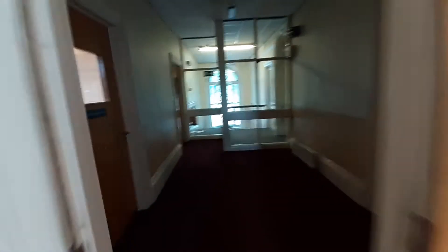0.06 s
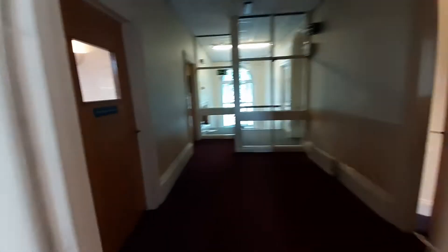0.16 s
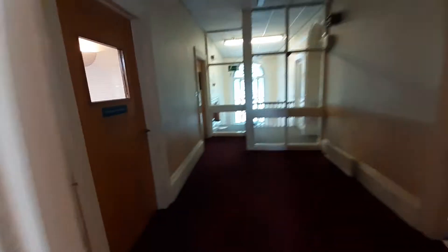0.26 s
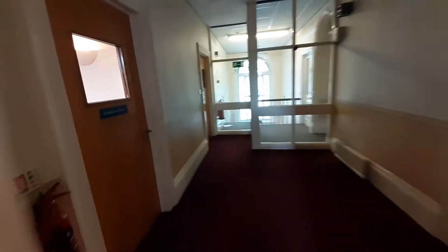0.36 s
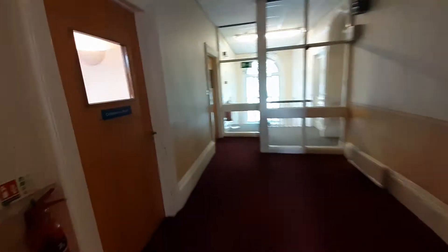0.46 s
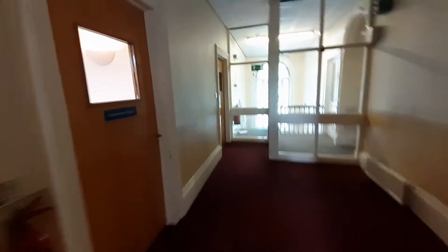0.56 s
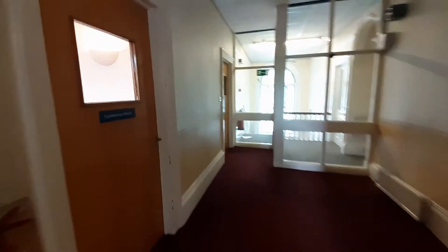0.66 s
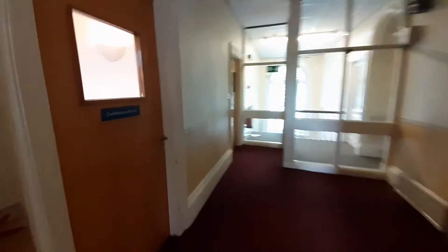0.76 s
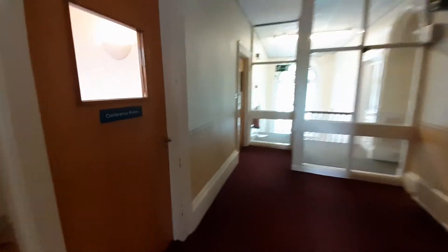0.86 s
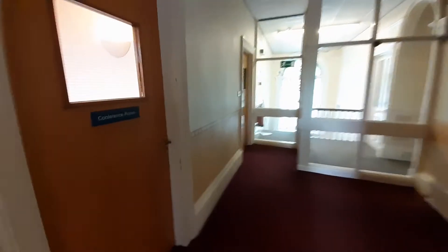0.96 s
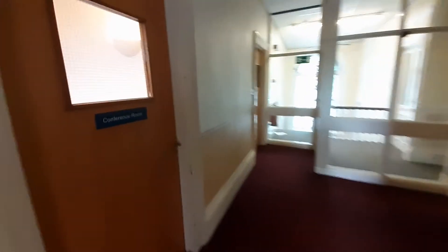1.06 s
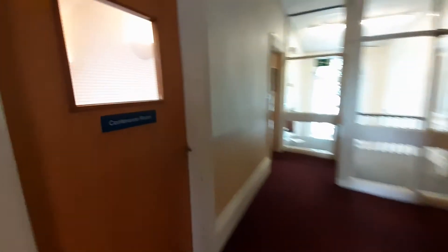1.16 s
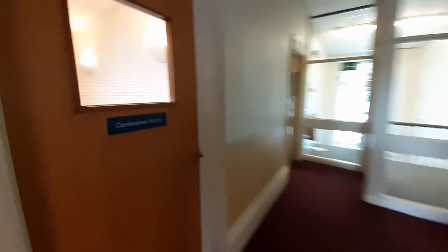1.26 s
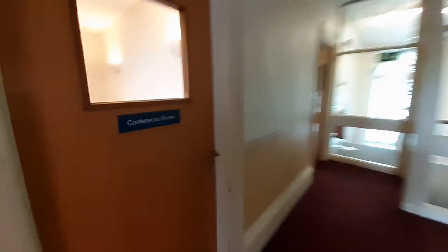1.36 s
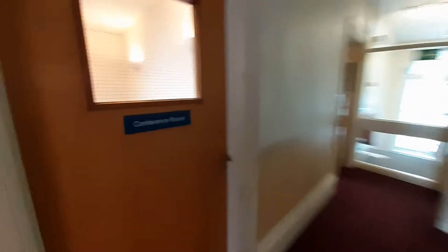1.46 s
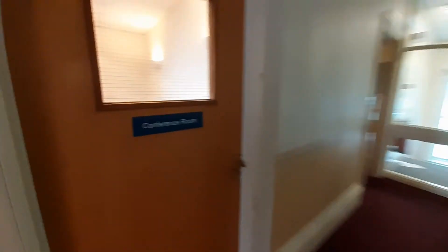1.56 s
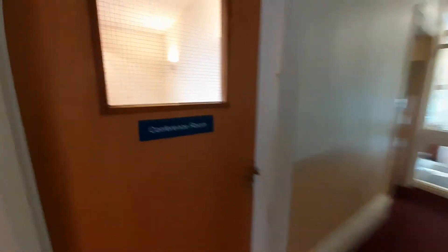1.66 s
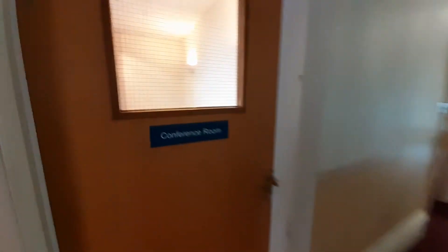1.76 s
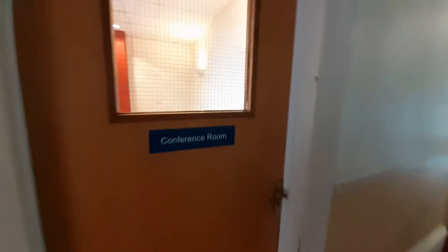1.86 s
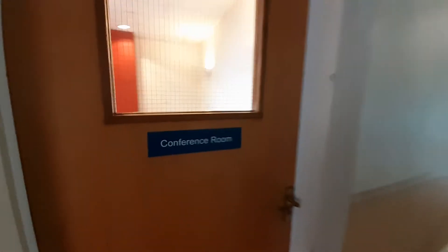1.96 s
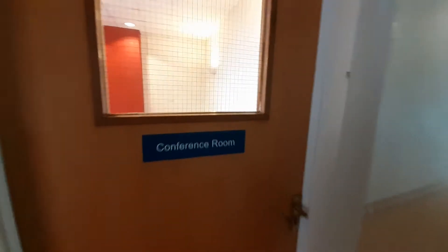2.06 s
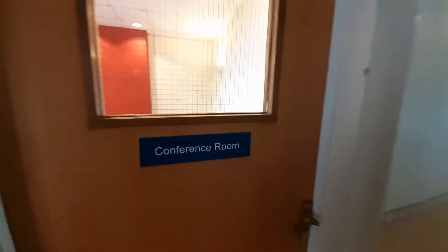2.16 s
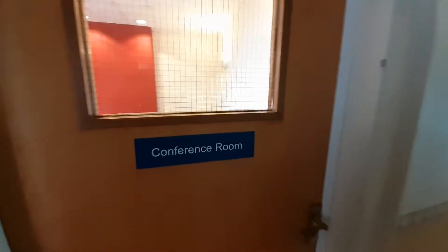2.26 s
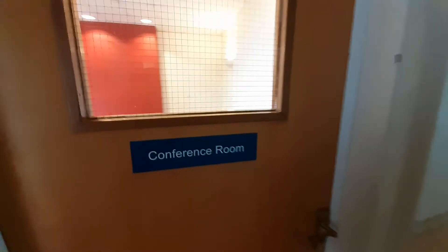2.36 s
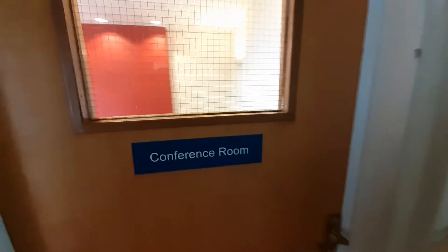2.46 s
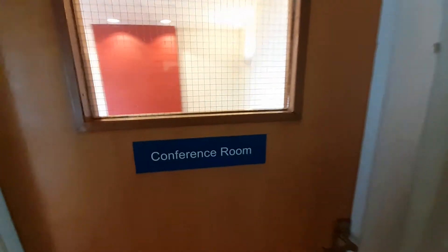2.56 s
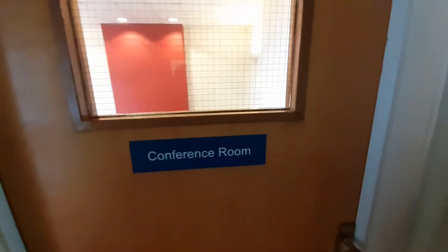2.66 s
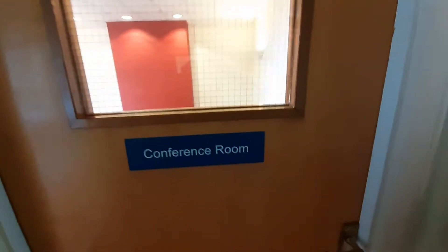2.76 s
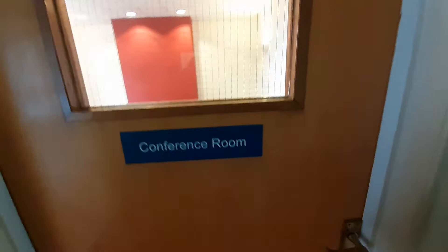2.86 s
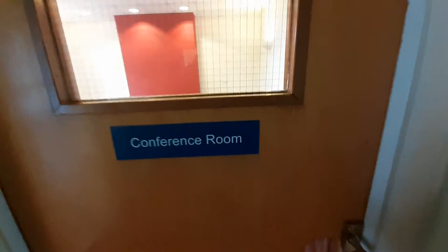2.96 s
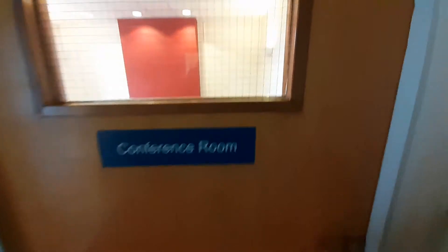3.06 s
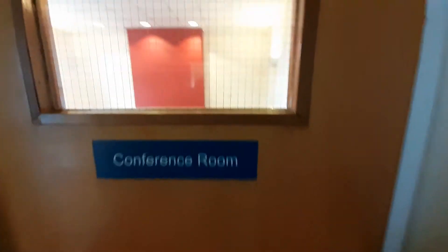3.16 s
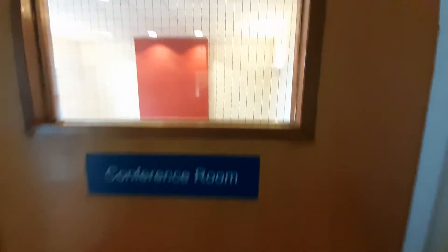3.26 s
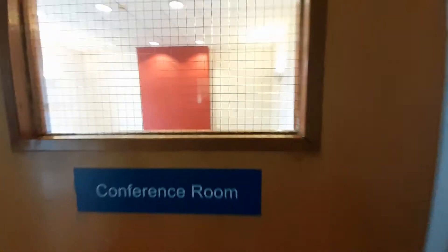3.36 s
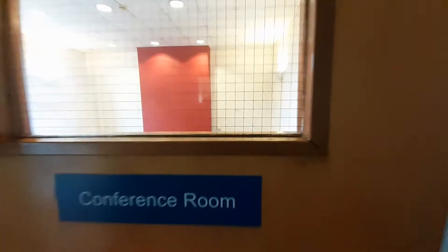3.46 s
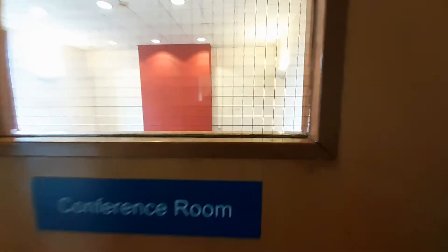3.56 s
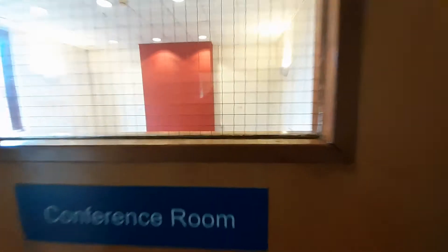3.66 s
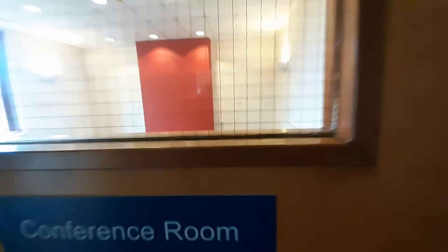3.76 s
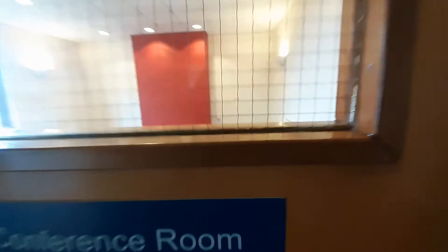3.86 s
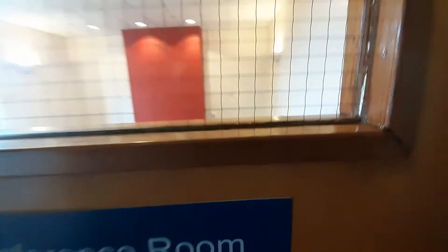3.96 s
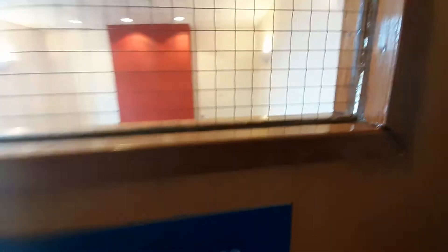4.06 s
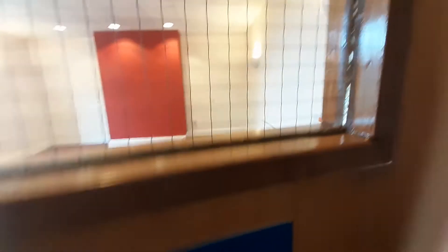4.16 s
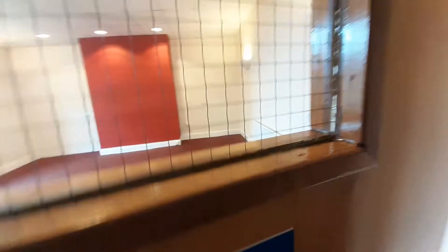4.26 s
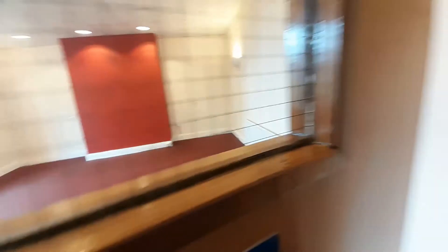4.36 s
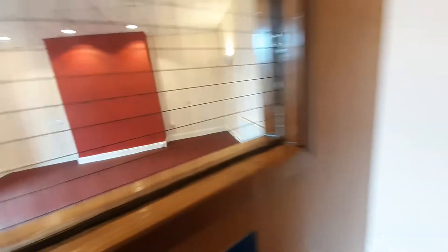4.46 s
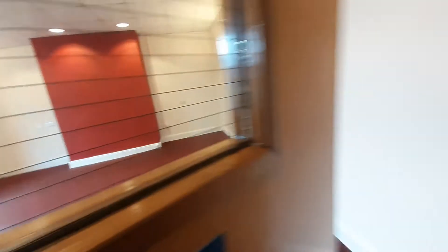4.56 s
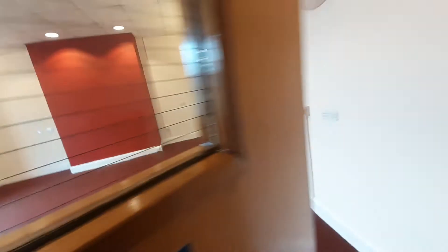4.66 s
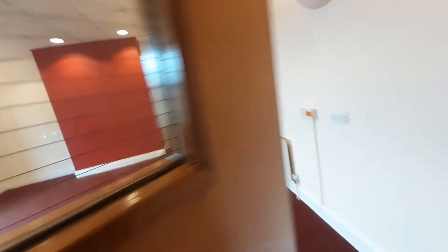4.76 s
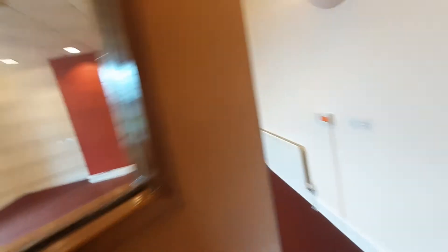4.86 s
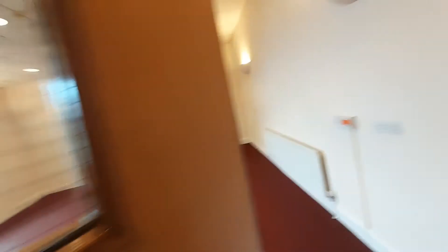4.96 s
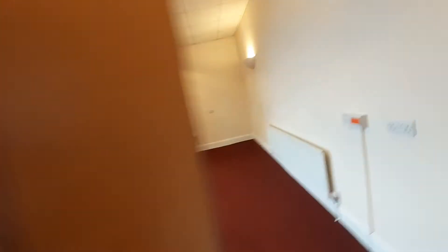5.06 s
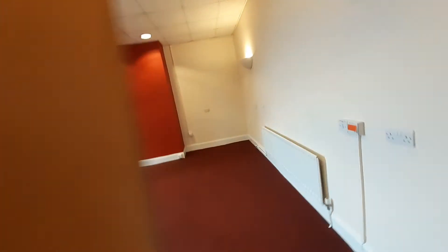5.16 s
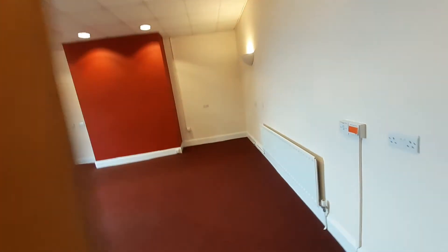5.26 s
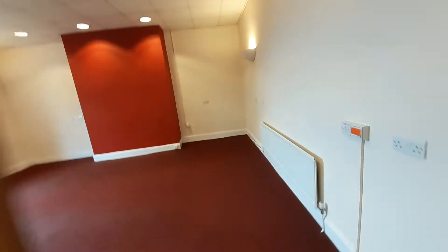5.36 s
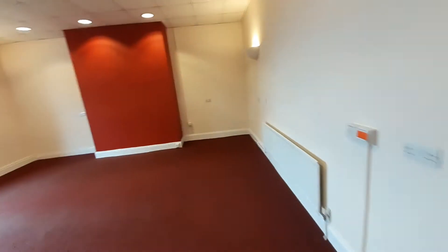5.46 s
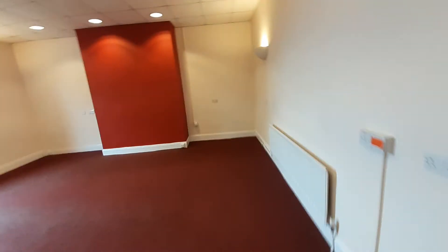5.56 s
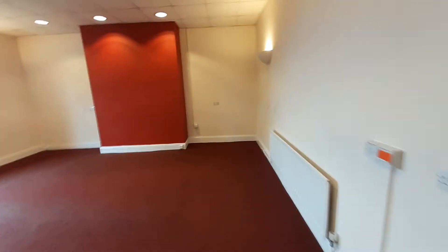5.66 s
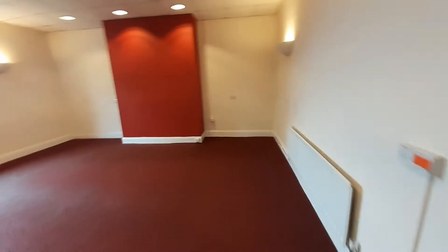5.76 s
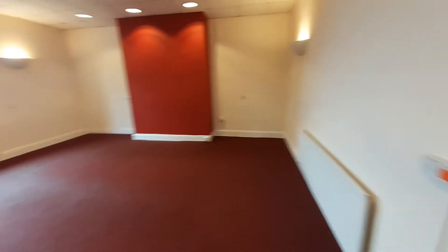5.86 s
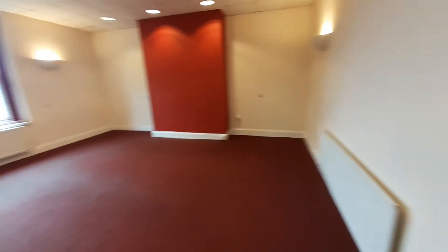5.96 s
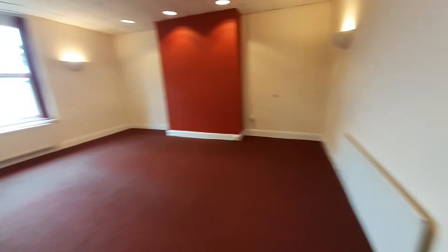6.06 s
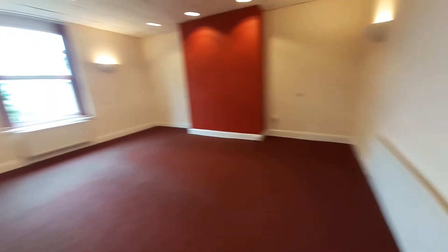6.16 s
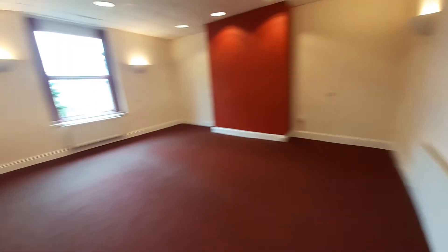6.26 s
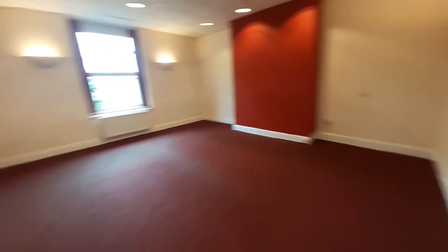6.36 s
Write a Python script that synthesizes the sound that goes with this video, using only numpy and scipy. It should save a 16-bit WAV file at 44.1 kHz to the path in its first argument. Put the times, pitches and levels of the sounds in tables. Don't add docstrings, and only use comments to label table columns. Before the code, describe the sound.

Close stereo handheld phone pickup in an empty building. A heel thump and dry snaps open with jacket rustle, then soft steps on carpeted boards. A handle's steel parts tick rapidly, the bolt clacks hard and scrapes, and the wooden door rings and shudders. Low wind-like buffets flutter across the two microphones, followed by a few sharp shoe and door-edge knocks in a bare, echoing room.

```python
import sys
import numpy as np
from scipy import signal
from scipy.fft import rfft, irfft
from scipy.io import wavfile
from scipy.ndimage import uniform_filter1d

SR = 44100
rng = np.random.default_rng(int(sys.argv[2]) if len(sys.argv) > 2 else 0)


def invert_db(x):
    u = np.asarray(x, float) / 20
    return 10 ** u


def store_pcm(level_fs):
    pcm = np.round(np.clip(level_fs, -1, 1) * 32767).astype(np.int16)
    wavfile.write(sys.argv[1], SR, np.atleast_2d(pcm).T)


N = 282618
T = np.arange(N) / SR

# full at t/s, held/s, rise/(dB per s), swish level/dB, sleeve rub level/dB
GESTURES = [(.065, .01, 200, -71, -46), (.16, 0.26, 82, -48, -45), (.67, 0.061, 30, -44, -51),
            (.79, 0.07, 57, -44, -44.5), (1.175, 0.23, 413, -56.5, -57), (1.55, 0.0067, 107, -62, -57.5),
            (1.89, 0.11, 69, -58.5, -64.5), (2.27, 0.04, 23, -59, -56.5), (2.7, 0.097, 45, -40.5, -45.5),
            (2.9, 0.22, 93, -43, -50), (3.32, .64, 48, -57.5, -47), (4.271, 0.16, 101, -45.5, -52),
            (4.68, 0.42, 56, -59.5, -54), (4.96, 0.11, 69, -45.5, -51), (5.15, 0.0083, 100, -52, -52),
            (5.245, 0.0059, 152, -48, -50), (5.33, 0.023, 150, -55, -55.5), (5.45, 0.27, 100, -57, -58),
            (5.72, 0.036, 62, -65, -54), (5.88, 0.057, 194, -53.5, -44), (6.2, 0.04, 130, -58.5, -54),
            (6.4, .02, 159, -53.5, -49.5)]
# full at t/s, held/s, rise/(dB per s), level/dB
FOLDS = [
    (.14, .04, 90, -50.5),
    (.845, 0.015, 120, -50.5),
    (4.3, 0.2, 87, -50.5),
    (5.1, 0.25, 33, -53),
    (6.39, .03, 202, -49.5),
]
# f/Hz, level/dB
SWISH_TONE = [(1710, -11.5), (2900, -4), (3570, -1.5), (4000, -0.5), (4710, -3.5), (5210, -4.5), (6190, -6),
              (7610, -4), (9160, -13), (12000, -7), (15000, -10.5), (16000, -10.5)]
BRUSH_TONE = [(1000, -26), (1400, -6), (2000, -4.5), (2800, -10.5), (3500, -19)]
RUB_TONE = [(330, -7), (460, -3), (800, -4.5), (1250, -4.5), (1700, -15)]
RUMBLE_TONE = [(18, -35), (30, -14), (58, 6), (92, -9.5), (128, 2), (166, -0.5), (261, 0.5), (413, -11),
               (700, -39), (910, -21), (1540, -120)]
# t/s, peak level/dB, centre f/Hz, bright edge level/dB, t60/s
SNAPS = [(0.0216, -21.5, 1140, -45, 0.008), (0.183, -18, 600, -38.5, 0.015),
         (0.1824, -19, 1990, -40, 0.006), (3.231, -35.5, 416, -3.5, 0.038), (5.386, -48.5, 520, -14, 0.03),
         (5.47, -39.5, 1500, 9, 0.029), (5.618, -42.5, 606, -23, 0.083), (5.828, -42, 450, -30, 0.03),
         (5.849, -15.5, 568, -15.5, 0.017), (5.85, -14.5, 1370, -20, 0.03),
         (5.875, -16.5, 1090, -21, 0.024), (5.891, -26, 1250, -25, 0.094), (5.9, -28, 450, -35, 0.03),
         (5.944, -26, 477, -43, 0.014), (5.992, -36, 705, -35, 0.044), (6.02, -40, 418, -35, 0.05),
         (6.19, -43, 820, -24, 0.28), (6.347, -53, 1990, -12, 0.018), (6.362, -36.5, 2020, 3.5, 0.033)]
# t/s, peak level/dB, deep thud level/dB, t60/s
STEPS = [(0.0217, -15.5, -47, 0.26), (0.06, -19.5, -16, 0.56), (0.118, -24.5, -12, 0.091),
         (0.632, -28.5, 0.5, 0.58), (0.707, -35, 3, 0.74), (1.169, -43, -3, 1), (1.38, -46, -6, 1),
         (1.886, -48.5, 2.5, 0.79), (2.12, -53, -12, 0.72), (2.299, -54, -1, 0.56), (2.477, -60, 18, 0.7),
         (2.63, -50, -6, 0.4), (2.9, -49.5, -3, 0.5), (3.2, -52, 3, 0.4), (4.25, -48, 0, 0.5),
         (6.369, -40.5, -30, 0.75)]
# f/Hz, width/Hz, level/dB
BOARDS = [(106.4, 40, -4), (256.6, 68, -0.5), (320, 46.3, 1), (404, 142, -11.5)]
# t/s, peak level/dB, ring f/Hz, sharpness level/dB
LATCH_TICKS = [(3.258, -27.5, 1782, -29), (3.3245, -38, 2040, -22), (3.3285, -29, 1770, -23),
               (3.347, -28, 2200, -15), (3.3515, -24, 1930, -19), (3.3593, -27.5, 3120, -6),
               (3.367, -24.5, 2520, 0), (3.3701, -28, 1900, 5.5), (3.389, -32, 1850, -17),
               (3.415, -36, 2200, -20), (3.5035, -35, 2020, -1), (3.5109, -17, 2060, -11),
               (3.5175, -16.5, 1870, -5.5), (3.5587, -25, 3440, -5), (3.5663, -17.5, 2200, 2.5),
               (3.571, -22, 4720, -9), (3.5989, -16.5, 1480, -30), (3.6255, -9, 1870, -27),
               (3.634, -20, 1860, -25), (3.639, -22, 3700, -9), (3.6431, -8, 1250, -36),
               (3.7445, -31, 3900, -8), (3.7571, -14, 2700, -5.5), (3.761, -14, 2130, -27),
               (3.8392, -29, 2800, 13), (3.8535, -22.5, 3600, -12), (3.867, -33, 3580, 8),
               (3.8736, -22.5, 3520, 7), (3.8795, -34, 3000, 7), (3.8866, -21.5, 2850, 1),
               (3.8928, -28, 3700, -4), (3.9, -29, 4300, 2), (3.913, -21, 4200, -3), (3.931, -34, 4330, 2),
               (3.9375, -25, 2500, 2), (3.942, -36, 2500, -12), (3.953, -31, 2000, -14)]
# f/Hz, width/Hz, level/dB
STEEL = [(1900, 400, 0), (2400, 500, -1), (3500, 1000, -6), (4600, 1500, -11)]
SPRING = [(4670, 1530, 9), (8240, 1550, 7.5), (11400, 3500, 3), (14800, 1600, -1.5)]
# t/s, level/dB, hardness f/Hz
BLOWS = [(3.327, -48, 1200), (3.353, -42, 400), (3.361, -41.5, 98), (3.368, -25.5, 816), (3.375, -35, 940),
         (3.392, -30.5, 476), (3.512, -35.5, 905), (3.568, -33, 410), (3.598, -38, 503), (3.63, -31.5, 400),
         (3.645, -20.5, 890), (3.654, -26.5, 193), (3.666, -30.5, 109), (3.68, -36, 200), (3.711, -39, 201),
         (3.755, -36, 676)]
# t/s, level/dB, hardness f/Hz
LOCK_KNOCKS = [(3.326, -47, 900), (3.349, -36.5, 650), (3.357, -39, 650), (3.3665, -25.5, 750),
               (3.372, -28.5, 694), (3.391, -42, 500), (3.408, -40, 700), (3.428, -42, 546),
               (3.497, -44, 650), (3.515, -47, 900), (3.567, -34, 850), (3.579, -41, 650),
               (3.598, -32, 700), (3.626, -35, 790), (3.635, -40, 700), (3.643, -21, 750),
               (3.652, -34, 900), (3.67, -41, 700), (3.712, -40, 500), (3.756, -31, 850)]
# f/Hz, level/dB, t60/s
LEAF = [(71, -5.5, 0.28), (98, -1.5, 0.22), (160, -7, 0.2), (253, 7.5, 0.11), (385.4, 3.5, 0.083),
        (471, -6.5, 0.19), (517, -0.5, 0.058), (635, -10, 0.062), (675, -1.5, 0.051), (822, -2.5, 0.11),
        (900, 1.5, 0.018), (993, -4, 0.053), (1250, -24, 0.066), (1450, -29, 0.02)]
LOCK_CASE = [(485, 2, 0.14), (583, -5, 0.09), (636, -1, 0.074), (701, 2, 0.066), (764, -6, 0.062),
             (837, -4.5, 0.09), (882, -2.5, .06), (971, 0, 0.065), (1090, -6, .08), (1250, -12, 0.073)]
# t/s, drag level/dB, door shudder level/dB
DRAG = [
    (3.3, -60, -54),
    (3.392, -54, -29),
    (3.502, -41, -42),
    (3.564, -34, -16.5),
    (3.704, -38, -37),
    (3.75, -45, -50),
    (3.8, -32, -36),
    (3.928, -33.5, -23),
    (3.975, -64, -49),
]
# t/s, peak level/dB, pitch f/Hz, length/ms
EDDIES_LEFT = [(4.817, -23.5, 124.5, 17), (4.881, -17.5, 106.7, 3.6), (4.915, -20, 81.5, 62),
               (4.959, -15.5, 99.5, 12), (5.002, -14, 96, 44), (5.051, -27, 124, 13), (5.089, -29, 116, 10),
               (5.119, -19.5, 107.5, 57), (5.19, -21.5, 98, 24), (5.287, -24, 97, 28), (5.319, -22, 85, 17),
               (5.36, -22.5, 87, 25), (5.452, -22, 96.5, 22), (5.6, -30, 94, 40), (5.64, -32, 125.3, 19),
               (5.68, -33.5, 111, 19)]
EDDIES_RIGHT = [(4.43, -29, 103, 14), (4.478, -23, 108, 31), (4.526, -17, 160, 12), (4.553, -20, 134.3, 13),
                (4.623, -14.5, 138.6, 35), (4.66, -14, 176.3, 40), (4.681, -10, 244.5, 17),
                (4.709, -14.5, 164.3, 29), (4.76, -28, 123, 7.9), (4.807, -29, 96.4, 64),
                (4.885, -21.5, 92.3, 17), (5.027, -16, 129, 14), (5.047, -18.5, 140.6, 13),
                (5.076, -13, 112, 22.6), (5.115, -15, 208.7, 19), (5.14, -16.5, 92.3, 15),
                (5.185, -11, 90.4, 18.4), (5.215, -14.5, 115, 8.4), (5.24, -24, 98, 8.3),
                (5.403, -33, 111, 35)]

SETTLE_DB_PER_S = 87
STILL_SWISH_DB, STILL_RUB_DB, STILL_RUMBLE_DB = -72, -67.5, -73.5
BRUSH_PER_SWISH_DB, BRUSH_PER_RUB_DB, RUMBLE_PER_RUB_DB = -10, -5, -10
BREEZE_FROM_S, BREEZE_TO_S, BREEZE_DB = 3.44, 6.5, -54.5
JACKET_PAN_DB, FLOOR_PAN_DB, HANDLE_PAN_DB, TICK_PAN_SPREAD_DB = 2.5, 4.5, 1, 4.9
LAG_PER_DB = 2.5
HANDLE_LAG = -12
SOLE_DB = -18
ROOM_T60_S, ROOM_TREBLE_T60_S, ROOM_DB = .7, .4, -7.5
TICK_T60_S, SPRING_DB_PER_S = 0.023, 2200
CLACK_S, CLACK_DB, CLACK_HZ, CLACK_T60_S = 3.6435, -5, 2270, 0.015
SEAL_PER_DRAG_DB = -9.5
PEEL_FROM_S, PEEL_TO_S, PEEL_DB, PEEL_FADE_DB = 3.842, 3.955, -46, -27
APART = 1.0
WAKE_S, WAKE_DB, WAKE_PITCH, WAKE_MS = 0.0222, -15.5, 1.4, 6.9
PUSH_DB = -3.5


def unit(x):
    return x / np.sqrt(np.mean(x ** 2, axis=-1, keepdims=True) + 1e-18)


def top(x):
    return x / np.max(np.abs(x))


def colour(x, tone):
    hz, db = np.transpose(tone)
    f = np.fft.rfftfreq(x.shape[-1], 1 / SR) + 1
    gain_db = np.interp(np.log(f), np.log(hz), db, left=-80, right=-80)
    return irfft(rfft(x) * invert_db(gain_db), x.shape[-1])


def resonate(x, body):
    total = 0
    for k, (hz, width, db) in enumerate(body):
        total = total + (-1) ** k * invert_db(db) * signal.lfilter(*signal.iirpeak(hz, hz / width, SR), x)
    return total


def walk(rate):
    k = int(SR / rate)
    stairs = np.repeat(rng.standard_normal(N // k + 1), k)
    return unit(uniform_filter1d(uniform_filter1d(stairs, k), k)[:N])


def ports(like_hz, lag=0):
    mid, side = rng.standard_normal((2, N))
    side = signal.lfilter(*signal.butter(1, like_hz, "high", fs=SR), side)
    return np.array([mid + side, np.roll(mid - side, lag)])


def burst(t60, attack_s, click=0., size=22050):
    t = np.arange(size) / SR
    return (t == 0) * click + rng.standard_normal(size) * (1 - np.exp(-t / attack_s)) * invert_db(-60 * t / t60)


def wide(*shape, **more):
    alone = [burst(*shape, size=more["size"]) for _ in range(2)]
    return burst(*shape, **more) + APART * np.array(alone)


def place(out, sound, s, pan_db, lead=None):
    if lead is None:
        lead = np.clip(LAG_PER_DB * pan_db, -20, 20)
    for ch, sign in enumerate((1, -1)):
        i = int(s * SR - sign * lead / 2)
        out[ch, i:i + sound.shape[-1]] += invert_db(sign * pan_db / 2) * np.atleast_2d(sound)[-ch, :N - i]


def curves(table):
    s, *columns = np.transpose(table)
    return [np.interp(T, s, c, left=-120, right=-120) for c in columns]


def gesture_power(moves, column):
    total = 0
    for row in moves:
        full_s, held_s, rise = row[:3]
        before = rise * np.clip(full_s - T, 0, None)
        after = SETTLE_DB_PER_S * np.clip(T - full_s - held_s, 0, None)
        total = total + invert_db(row[column] - before - after) ** 2
    return total


def jacket():
    fast, slow = gesture_power(GESTURES, column=3), gesture_power(GESTURES, column=4)
    airy = 1. * (T > BREEZE_FROM_S) * (T < BREEZE_TO_S)
    breeze = uniform_filter1d(airy, size=6000) * invert_db(BREEZE_DB) ** 2
    grain = invert_db(2.0 * np.clip(rng.exponential(size=(2, N)), 0, 7))

    swish = np.sqrt(fast + invert_db(STILL_SWISH_DB) ** 2) * invert_db(.9 * walk(35))
    swish = swish * unit(colour(ports(1500, lag=13) * grain, SWISH_TONE))

    brush_power = gesture_power(FOLDS, column=3)
    brush_power = brush_power + fast * invert_db(BRUSH_PER_SWISH_DB) ** 2 + slow * invert_db(BRUSH_PER_RUB_DB) ** 2
    brush = np.sqrt(brush_power) * invert_db(1.1 * walk(30)) * unit(colour(ports(1100, lag=13), BRUSH_TONE))

    rub = np.sqrt(slow + invert_db(STILL_RUB_DB) ** 2) * invert_db(2.0 * walk(30))
    rub = rub * unit(colour(ports(1500, lag=13), RUB_TONE))

    body = np.sqrt(slow * invert_db(RUMBLE_PER_RUB_DB) ** 2 + breeze + invert_db(STILL_RUMBLE_DB) ** 2)
    rumble = body * invert_db(2.2 * walk(25) + 2.5 * walk(7)) * unit(colour(ports(250, lag=13), RUMBLE_TONE))
    pan = invert_db(np.array([[JACKET_PAN_DB], [-JACKET_PAN_DB]]) / 2)
    return (swish + brush + rub) * pan + rumble


def snaps():
    out = np.zeros((2, N))
    for s, db, hz, edge_db, t60 in SNAPS:
        crack = burst(t60, .0003, click=7., size=12000)
        crack = crack + .22 * burst(7 * t60, .004, size=12000)
        wood = resonate(resonate(crack, [(hz, 0.5 * hz, 3)]), [(1.29 * hz, 2.4 * hz, 0)])
        wood = wood + resonate(crack, [(1450, 430, -11.0), (480, 250, -5)])
        wood = signal.sosfilt(signal.butter(3, [310, 2400], "band", fs=SR, output="sos"), wood)
        edge = resonate(crack, [(3730, 3300, -1.0), (8100, 3400, -1.2)])
        place(out, invert_db(db) * (top(wood) + invert_db(edge_db) * top(edge)), s, FLOOR_PAN_DB)
    return out


def steps():
    out = np.zeros((2, N))
    for s, db, thud_db, t60 in STEPS:
        heel = burst(t60, 0.005, click=27.0)
        heel[1:] *= invert_db(2.2 * walk(60)[1:22050])
        heel = signal.lfilter(*signal.butter(2, 1300, fs=SR), heel)
        boom = top(resonate(heel, BOARDS))
        slap = resonate(burst(.03, .0004, click=8.), [(1200, 1600, 0)])
        slap = top(resonate(slap, [(1000, 1400, 0), (1000, 1400, 0), (900, 900, 0)]))
        thud = top(resonate(heel, [(69.4, 50, 0)]))
        place(out, invert_db(db) * (boom + invert_db(SOLE_DB) * slap + invert_db(thud_db) * thud), s, FLOOR_PAN_DB)
    return out


def room(x):
    t, noise = T[:SR], ports(1160)[:, :SR]
    low = signal.lfilter(*signal.butter(1, 1200, fs=SR), noise)
    tail = low * invert_db(-60 * t / ROOM_T60_S) + (noise - low) * invert_db(-60 * t / ROOM_TREBLE_T60_S)
    tail = tail * (1 - np.exp(-t / 0.0024))
    return invert_db(ROOM_DB) * signal.fftconvolve(x.mean(0, keepdims=True), unit(tail) / np.sqrt(SR))[:, :N]


def rings(modes, turn_hz):
    t, turn = T[:SR // 2], rng.uniform(-1.14, 1, (len(modes), 2, 1))
    total = 0
    for (hz, db, t60), a in zip(modes, turn):
        phase = 2 * np.pi * hz * t + min(hz / turn_hz, 2) * a
        total = total + invert_db(db - 60 * t / t60) * np.sin(phase)
    return total


def latch():
    out = np.zeros((2, N))
    for s, db, hz, sharp_db in LATCH_TICKS:
        hit = wide(TICK_T60_S, .0004, click=7., size=8000)
        hit = hit + .14 * wide(4 * TICK_T60_S, .003, size=8000)
        steel = resonate(hit, [(hz, 0.35 * hz, 12)]) + resonate(hit, STEEL)
        steel = resonate(steel, [(hz, 2.2 * hz, 0)])
        spring = resonate(hit * invert_db(-SPRING_DB_PER_S * T[:8000]), SPRING)
        tick = invert_db(db) * (top(steel) + invert_db(sharp_db + 5.0) * top(spring))
        pan_db = HANDLE_PAN_DB + TICK_PAN_SPREAD_DB * rng.standard_normal()
        place(out, tick, s, pan_db, lead=HANDLE_LAG)
    clack = wide(CLACK_T60_S, 0.00032, click=2.2, size=8000)
    clack = resonate(clack, [(CLACK_HZ, 500, 0), (2950, 400, -7), (3700, 400, -9), (1150, 500, -3)])
    place(out, invert_db(CLACK_DB) * top(clack), CLACK_S, HANDLE_PAN_DB, lead=HANDLE_LAG)
    return out


def bolt_scrape(scrape_db):
    peel_db, = curves([(PEEL_FROM_S - .03, PEEL_DB - 12), (PEEL_FROM_S, PEEL_DB),
                       (PEEL_TO_S, PEEL_DB + PEEL_FADE_DB)])
    rasp = unit(resonate(ports(690, lag=HANDLE_LAG), [(2150, 1800, 3.0), (4400, 1700, -2.5)]))
    seal = unit(resonate(ports(900), SPRING))
    return invert_db(scrape_db - 7.5) * rasp + (invert_db(scrape_db + SEAL_PER_DRAG_DB) + invert_db(peel_db)) * seal


def door():
    blows, knocks = np.zeros((2, 2, N))
    for s, db, hz in BLOWS:
        blow = resonate(burst(.03, .001, click=3., size=3000), [(hz, 1.1 * hz, 0)])
        place(blows, invert_db(db - 29) * top(blow), s, 1.5, lead=-4)
    for s, db, hz in LOCK_KNOCKS:
        knock = resonate(burst(.012, .001, click=6., size=2000), [(hz, 1.1 * hz, 0)])
        place(knocks, invert_db(db - 22) * top(knock), s, 1., lead=-6)
    scrape_db, shudder_db = curves(DRAG)
    catch = invert_db(2.8 * walk(130))
    blows += invert_db(shudder_db - 50.0) * catch * ports(650)

    panel = unit(resonate(wide(0.047, 0.00018, size=22050), [(530, 780, 0)]))
    leaf = signal.fftconvolve(blows, rings(LEAF, 830.0) + 0.21 * panel, axes=1)[:, :N]
    lock = signal.fftconvolve(knocks, rings(LOCK_CASE, 400.0), axes=1)[:, :N]
    return latch() + catch * bolt_scrape(scrape_db) + leaf + lock


def draught():
    out, lurch = np.zeros((2, N)), np.tanh(walk(220))
    t = T[:4410] - T[2205]
    for ch, eddies in enumerate((EDDIES_LEFT, EDDIES_RIGHT)):
        wake = []
        for s, db, hz, ms in eddies:
            a, b = rng.standard_normal(2)
            late_s = ms / 2000 + WAKE_S * (1 + .3 * a)
            wake.append((s + late_s, db + WAKE_DB + 3 * b, WAKE_PITCH * hz, WAKE_MS))
        for s, db, hz, ms in list(eddies) + wake:
            i = int(s * SR) - 2205
            pitch = hz * np.exp(.45 * lurch[i:i + 4410])
            phase = 2 * np.pi * (rng.uniform() + np.cumsum(pitch) / SR)
            wobble = np.cos(phase) + invert_db(PUSH_DB) * np.cos(phase / 2)
            wobble += invert_db(1.73 * (db + 7.5)) * np.cos(2 * phase + 1)
            wobble += invert_db(2.47 * (db + 5.0)) * np.cos(3 * phase)
            wobble += invert_db(3.14 * (db + 6.0)) * np.cos(4 * phase + 2)
            swell = np.exp(-(t / (0.00053 * ms + 0.00064)) ** 2)
            out[ch, i:i + 4410] += invert_db(db - 5.5) * swell * wobble
    return out


def scene():
    knocks = snaps() + steps() + door()
    return jacket() + knocks + room(knocks) + draught()


def roll_off(x):
    return signal.sosfilt(signal.butter(12, 17000, fs=SR, output="sos"), x)


def record(dry):
    x = signal.sosfilt(signal.butter(4, 48, "high", fs=SR, output="sos"), dry)
    x = signal.sosfilt(signal.ellip(8, .2, 50, 16300, fs=SR, output="sos"), x)
    return roll_off(x)


dry = scene()
out = record(dry)
store_pcm(out)
```